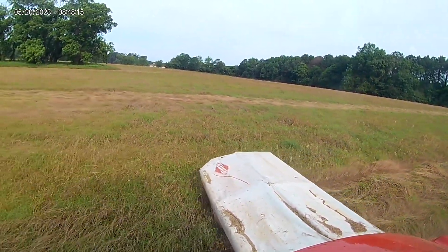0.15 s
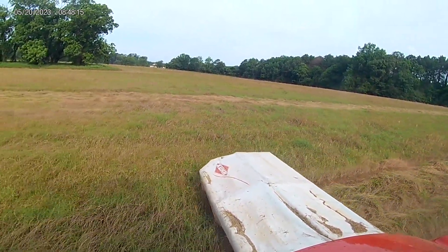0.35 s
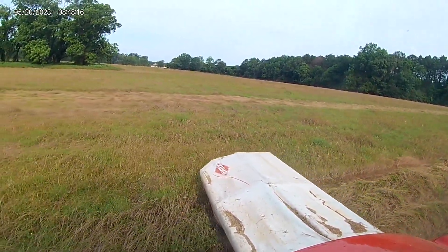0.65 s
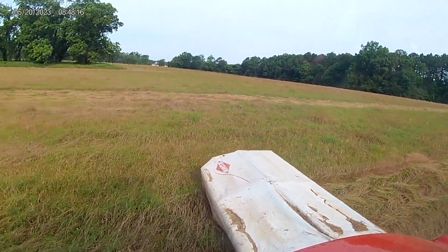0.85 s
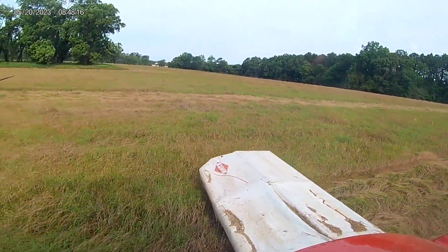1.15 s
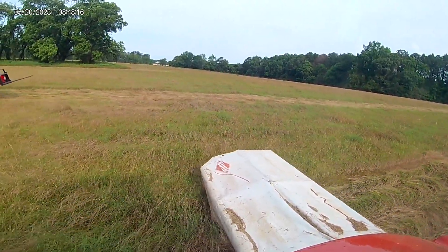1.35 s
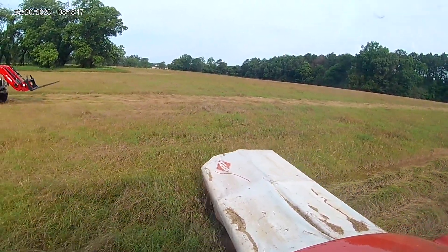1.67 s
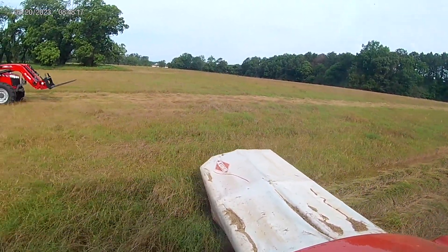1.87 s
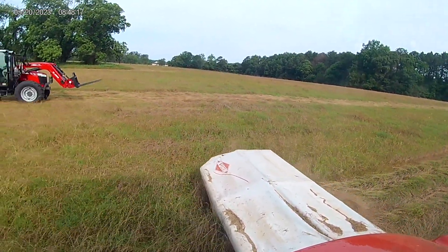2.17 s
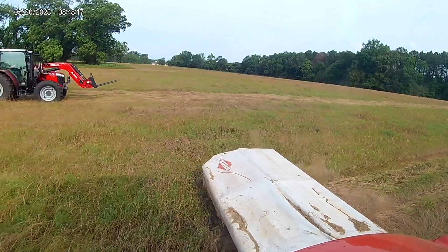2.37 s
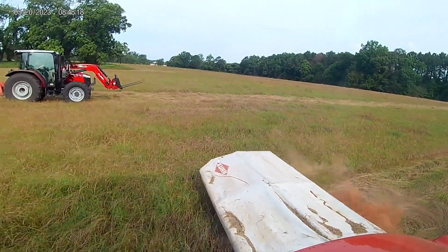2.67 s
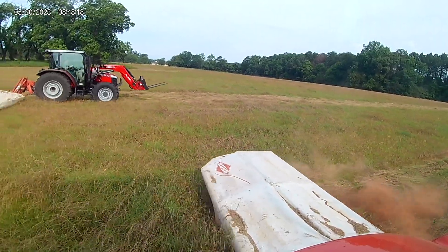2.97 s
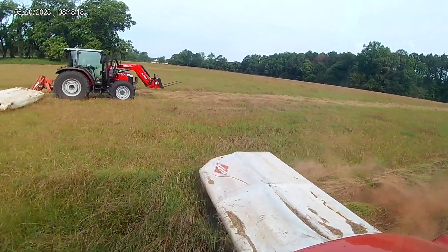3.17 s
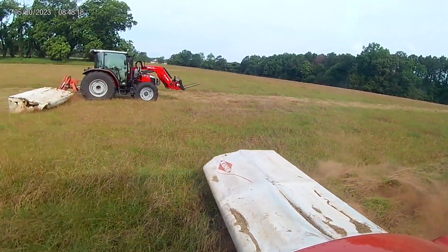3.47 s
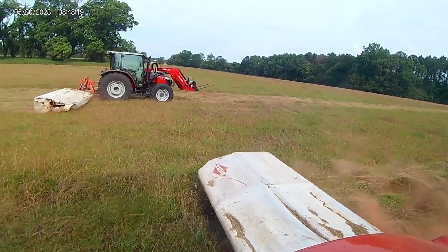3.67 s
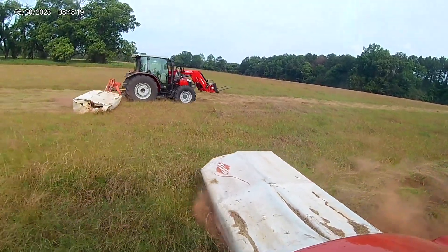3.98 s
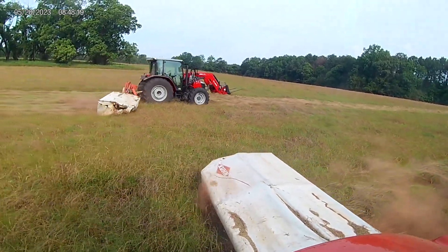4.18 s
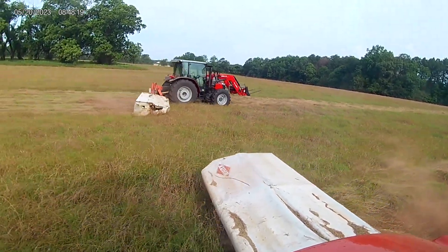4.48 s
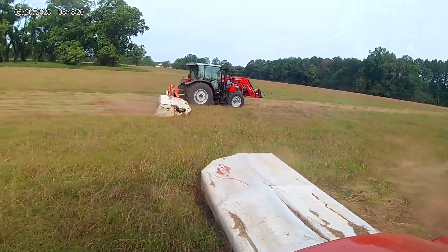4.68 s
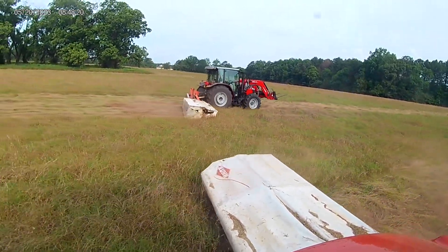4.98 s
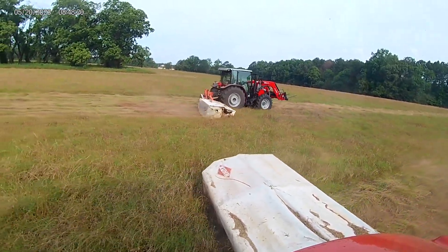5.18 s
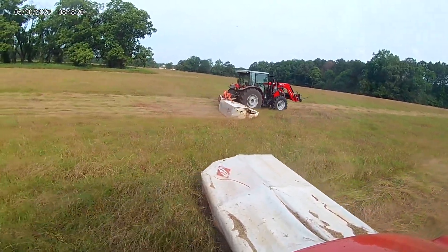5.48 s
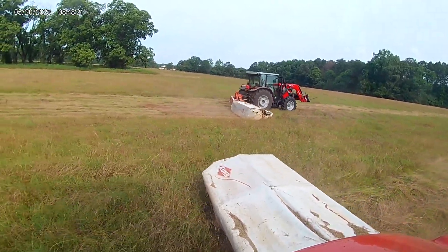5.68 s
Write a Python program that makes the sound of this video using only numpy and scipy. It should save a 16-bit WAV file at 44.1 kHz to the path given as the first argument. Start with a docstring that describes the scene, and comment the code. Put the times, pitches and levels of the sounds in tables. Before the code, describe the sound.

A tractor engine drones under load with a steady mid-pitched gear whine and a muffled, booming roar of rattling panels.

```python
"""From the start a tractor pulls a disc mower through hay; the microphone sits in a closed housing on the tractor.
One driveline speed sets the engine drone, the fan and the gear whine all through; random noise makes panels roar.
The frame booms in random swells, and faint tones peep, mostly in the first second.
Thick hay slows the drive, most of all near 3.4 s; the deep thump is weakest at 1.5 s and strongest at 5.3 s.
The housing muffles the treble throughout, down to the recorder's own hiss."""
import sys
import numpy as np
from scipy import signal
from scipy.fft import rfft, irfft
from scipy.io import wavfile
from scipy.ndimage import uniform_filter1d

SR = 44100
rng = np.random.default_rng(int(sys.argv[2]) if len(sys.argv) > 2 else 0)


def wav_out(sig):
    """Save sig, one row per channel (or a flat mono array), as 16-bit PCM at SR to the path in sys.argv[1]."""
    wavfile.write(sys.argv[1], SR, np.round(np.clip(np.atleast_2d(sig).T, -1, 1) * 32767).astype(np.int16))


N = 257544  # length of the sound [samples]


def undb(db):
    """Turn a level in dB into a plain gain."""
    return 10 ** (np.asarray(db) / 20)


def curves(table):
    """Draw straight lines between the rows of a table: one value per sample for each column after the time."""
    times, *columns = np.transpose(table)
    return [np.interp(np.arange(N) / SR, times, column) for column in columns]


def walk(rate):
    """A smooth random curve of mean 0 and spread 1, with `rate` fresh random values a second."""
    hold = int(SR / rate)
    steps = np.repeat(rng.standard_normal(N // hold + 1), hold)
    # two running averages turn the steps into smooth slopes
    curve = uniform_filter1d(uniform_filter1d(steps, hold), hold)[:N]
    return (curve - curve.mean()) / curve.std()


def tone(turns, db, waver_db, slip):
    """A sine locked to a shaft; its level (dB) and phase (slip, radians) waver as loads shift."""
    level_db = db + waver_db * (walk(9) + 0.68 * walk(40))
    phase = 2 * np.pi * turns + slip * walk(14)
    return np.sqrt(2) * undb(level_db) * np.sin(phase)


def resonance(hz, at, width):
    """Bell curve of a resonance: 1 at its pitch, one half at the edges of its width."""
    return 1 / (1 + (2 * (hz - at) / width) ** 2)


def noise(colour, peaks=(), gate=1):
    """White noise, gated in time, then filtered to a (Hz, dB per Hz) colour with resonances on top."""
    hz = np.fft.rfftfreq(N, 1 / SR) + 1  # 1 Hz up, so that the logarithm exists
    colour_hz, colour_db = np.transpose(colour)
    db = np.interp(np.log(hz), np.log(colour_hz), colour_db)
    for at, width, rise_db in peaks:
        db = db + rise_db * resonance(hz, at, width)
    white = rfft(gate * rng.standard_normal(N))
    return irfft(white * undb(db), N) * np.sqrt(SR / 2)  # the root makes the levels count per Hz


def surges(table):
    """Tones that swell and fade, each straying about its own pitch; also returns how fully a surge is on."""
    edge_s = 0.032  # rise and fall time; start and end are the half-way points
    t, sound, on = np.arange(N) / SR, np.zeros(N), np.zeros(N)
    stray = 0.4 * walk(25)  # shared phase wander [radians]
    for start, length, db, hz in table:
        inside = np.minimum(t - start, start + length - t) / edge_s + 0.5
        shape = np.sin(np.pi / 2 * np.clip(inside, 0, 1)) ** 2
        phase = 2 * np.pi * (hz * t + rng.random()) + stray
        sound += np.sqrt(2) * undb(db) * shape * np.cos(phase)
        on = np.maximum(on, shape)
    return sound, on


def peeps():
    """Brief faint tones above the whine's octave, each a sine that swells and fades."""
    # faint tones: (start [s], length [s], level [dB], pitch [Hz])
    faint_tones = [(.38, 0.057, -41, 1036), (.63, .09, -34.5, 1045), (.74, 0.059, -37.5, 1036),
                   (.88, .08, -55, 2740), (.99, .05, -56, 2755), (2.72, .12, -41, 1100),
                   (3.92, 0.045, -36, 1100), (5.37, 0.06, -37, 1035)]
    sound, _ = surges(faint_tones)
    return sound


def fan(shaft):
    """Blades pass seven times a turn of the belt-driven shaft, which adds a hum at other multiples."""
    # fan tones: (multiple of the shaft rate, level [dB])
    fan_tones = [(3, -40), (5, -32), (7, -29), (8, -40), (9, -43.5), (10, -41.5), (14, -49)]
    return sum(tone(k * shaft, db, waver_db=0.47, slip=0.11) for k, db in fan_tones)


def waver_in_bands(rattle):
    """The treble above 1 kHz wavers at random in narrow bands, most deeply high up."""
    # depth of each band's own wavering: (pitch [Hz], depth [dB])
    waver_depth = [(1000, 1.5), (2100, 2.0), (2700, 4.5), (4600, 5.5)]
    waver_hz, waver_db = np.transpose(waver_depth)
    edges_hz = np.geomspace(1000, 4800, 57)
    shared_db = 0.22 * walk(2.2) + 0.27 * walk(7.9) + 0.44 * walk(120)
    sound = rattle
    for low, high in zip(edges_hz, edges_hz[1:]):
        band = signal.sosfiltfilt(signal.butter(2, (low, high), "band", fs=SR, output="sos"), rattle)
        depth_db = np.interp(low, waver_hz, waver_db)
        gain = undb(shared_db + depth_db * walk(32))
        gain = gain / np.sqrt(np.mean(gain ** 2))  # keeps the average power of the gain at 1
        sound = sound + (gain - 1) * band  # swaps the steady band for the wavering one
    return sound


def roar(crank):
    """Panels rattled by blades and combustion: noise lifted at every firing, two a turn of the crank."""
    # colour of the roar before its overall gain: (pitch [Hz], level [dB per Hz])
    colour = [(20, -52), (60, -54.5), (75, -51.5), (100, -49), (128, -49), (190, -48.5), (250, -51.5),
              (400, -49.5), (600, -55), (1000, -58.5), (1800, -69.5), (2200, -74), (3000, -86), (3900, -91),
              (4600, -101)]
    # panel resonances on the roar: (pitch [Hz], width [Hz], rise [dB])
    panels = [(95, 6.5, 5), (116, 12, 5), (174, 8.7, 3), (235, 21, 4.5), (283.5, 24, 8), (354, 23, -0.5),
              (460, 30, 0), (493, 46, 5), (850, 31, 4), (922, 26, 6), (1105, 56, 3), (1291, 46, 7.5),
              (1505, 20, 4.5), (1630, 69, 3.5), (1790, 70, 6), (3860, 340, 4.5)]
    # gain of the deepest thump: (time [s], level [dB])
    jolts = [(0, 2), (1, 2.5), (1.5, -7.5), (2, 0), (4.5, 0.5), (5.3, 10), (5.84, 2)]
    firing = 1 + 0.059 * np.cos(4 * np.pi * crank)
    muffled = colour + [(6000, -122)]  # the closed housing lets little treble in
    sound = undb(-2.5) * noise(muffled, panels, firing)
    # thump, body and rattle swell each in their own time
    thump = signal.sosfiltfilt(signal.butter(2, 55, fs=SR, output="sos"), sound)
    rattle = signal.sosfiltfilt(signal.butter(2, 1000, "high", fs=SR, output="sos"), sound)
    body = sound - thump - rattle
    thump_db = curves(jolts)[0]
    return undb(thump_db) * thump + undb(0.5 * walk(5.9)) * body + waver_in_bands(rattle)


def boom(at, width, db):
    """A frame mode: random shaking makes it hum and surge; a surge takes the place of the hum."""
    # loudest surges of all the frame modes: (start [s], length [s], level [dB], pitch [Hz])
    loud_surges = [(0.172, 0.1, -27, 151.2), (0.232, 0.047, -18.5, 104.3), (0.358, 0.03, -16, 107.7),
                   (0.42, 0.078, -19.5, 99), (0.54, 0.083, -17, 101), (0.656, 0.17, -23, 151.6),
                   (0.97, 0.076, -20, 98.7), (1, 0.051, -20.5, 151.7), (1.377, 0.094, -17, 104.4),
                   (1.474, 0.12, -29, 149.5), (1.558, 0.085, -18, 101.3), (1.764, 0.053, -22.5, 107),
                   (2.08, 0.065, -18.5, 102.8), (2.345, 0.091, -16.5, 99.8), (2.605, 0.085, -17.5, 104.3),
                   (2.793, 0.065, -17.5, 104.4), (3.066, 0.052, -17, 100.2), (3.31, 0.089, -15.5, 100.4),
                   (3.396, 0.063, -26, 150), (3.448, 0.068, -20.5, 99), (3.617, 0.1, -20.5, 103),
                   (3.74, 0.069, -18, 101.3), (3.791, 0.054, -20.5, 147.4), (3.883, 0.092, -17, 101.4),
                   (4.239, 0.054, -18.5, 101), (4.565, 0.037, -17.5, 98), (4.684, .05, -22, 163),
                   (4.819, 0.024, -15, 112), (4.897, 0.058, -17, 105.5), (4.976, 0.11, -19, 106.8),
                   (5.213, 0.092, -20, 98.6), (5.3, 0.1, -18, 100.2), (5.435, 0.03, -15.5, 150),
                   (5.496, 0.049, -16, 156), (5.59, 0.22, -24.5, 150.2), (5.658, 0.055, -18.5, 104.7),
                   (5.74, 0.056, -17, 105)]
    hz = np.fft.rfftfreq(N, 1 / SR)
    hum = irfft(rfft(rng.standard_normal(N)) * resonance(hz, at, width), N)
    # this mode takes the surges less than two widths away
    near = [row for row in loud_surges if abs(row[-1] - at) < 2 * width]
    surging, on = surges(near)
    return undb(db) * hum / hum.std() * (1 - on) + surging


def engine(crank):
    """Tones at whole and half multiples of the crank, in step as in a pulse; timing gears hum brokenly."""
    # steady drone: (multiple of the crank rate, level [dB])
    orders = [(1, -43), (2, -36.5), (6.5, -38), (7, -38), (8.5, -37), (10, -43), (11, -40.5), (12, -40),
              (13, -43), (16.5, -41), (18, -41), (30, -48.5), (42, -51.5)]
    # swell of the strongest multiples: (time [s], fourth [dB], fifth [dB], sixth [dB])
    throb_levels = [(0.0, -23, -39, -24.5), (0.18, -28.5, -26, -27), (1.59, -24.5, -28, -29.5),
                    (2.05, -29, -21.5, -27), (2.13, -29, -44, -27), (2.28, -23.5, -23.5, -26.5),
                    (2.55, -23, -33.5, -27), (2.6, -22, -41, -26), (2.7, -26, -25, -26),
                    (3.09, -30, -26.5, -25), (3.3, -24, -26, -29), (3.38, -32, -36, -31.5),
                    (3.45, -20, -33, -26.5), (3.84, -35, -22, -30.5), (3.92, -27, -32.5, -22),
                    (4.28, -27.5, -22, -29.5), (4.8, -25.5, -34.5, -27), (4.94, -34, -24, -30),
                    (5.06, -25, -23.5, -31.5), (5.73, -29.5, -29, -28), (5.79, -21, -18.5, -34),
                    (5.84, -39, -31, -30.5)]
    # teeth of each timing gear: one count per gear
    teeth_counts = (23, 31, 44, 46, 48)
    # swell of the timing gears: (time [s], then one level [dB] for each gear)
    timing_levels = [(0.0, -34, -36, -51, -47, -37), (0.06, -39, -40, -47.5, -52, -54),
                     (0.13, -39, -43, -44.5, -49, -40), (0.78, -39, -39.5, -49, -52.5, -43),
                     (0.99, -33, -50, -51.5, -49, -44), (1.06, -32, -40, -43, -51, -42),
                     (1.12, -31, -43, -49, -51, -43.5), (1.22, -39, -54, -45, -50, -47.5),
                     (1.59, -41, -35, -47, -50, -41), (1.97, -33.5, -47, -46, -41, -48.5),
                     (2.37, -42.5, -38, -49.5, -49.5, -43.5), (2.54, -38.5, -52, -42, -43, -42.5),
                     (3.25, -39, -41.5, -49, -47, -43.5), (3.32, -29, -37, -46, -44, -40),
                     (3.35, -33, -41.5, -46.5, -47, -48.5), (3.69, -44, -43, -44.5, -48, -42.5),
                     (4.5, -37.5, -44, -49.5, -54, -48.5), (4.9, -41, -40.5, -52, -49.5, -51),
                     (4.91, -50, -49, -54.5, -50, -51), (5.06, -36, -45, -50, -48, -48),
                     (5.3, -44.5, -44, -52.5, -50, -47), (5.84, -39.5, -48.5, -52.5, -50, -50)]
    # high multiples slip more
    drone = sum(tone(k * crank, db, waver_db=0.6, slip=0.25 + 0.02 * k) for k, db in orders)
    throb = sum(tone(k * crank, db, waver_db=1.06, slip=0.61)
                for k, db in enumerate(curves(throb_levels), start=4))
    timing = sum(tone(teeth * crank, db, waver_db=1.53, slip=1.4)
                 for teeth, db in zip(teeth_counts, curves(timing_levels)))
    return drone + throb + timing


def gears(mesh):
    """Meshing teeth whine with an octave; shafts that run out of true put side tones by the whine."""
    # swell of the gear tones: (time [s], whine [dB], octave [dB])
    whine_levels = [(0.05, -22.5, -23.5), (0.4, -20, -26.5), (0.53, -22.5, -24.5), (0.66, -19.5, -24.5),
                    (0.75, -23, -25.5), (1.01, -19, -25.5), (1.17, -22, -25), (1.52, -23.5, -23.5),
                    (1.57, -19, -29), (1.6, -19, -24.5), (1.76, -21, -25), (1.8, -23.5, -24.5),
                    (2.03, -20, -25.5), (2.16, -24, -25), (2.52, -18.5, -25.5), (2.6, -22.5, -23),
                    (3.7, -21, -26.5), (3.73, -18.5, -23), (3.97, -23, -25.5), (4.28, -20.5, -25.5),
                    (4.36, -23.5, -27.5), (4.63, -22.5, -25.5), (5.37, -21, -27), (5.59, -23, -26),
                    (5.64, -21.5, -25.5), (5.8, -22, -25)]
    # other gear tones: (multiple of the meshing rate, level [dB])
    gear_tones = [(.0391, -42), (.9607, -53), (.9167, -45), (1.0393, -45), (1.0833, -34), (1.8648, -44),
                  (1.9004, -42), (1.9167, -46), (2.0393, -39), (2.0833, -43), (3, -47), (3.0393, -56),
                  (4, -54.5)]
    whine_db, octave_db = curves(whine_levels)
    whine = tone(mesh, whine_db, waver_db=0.88, slip=0.41)
    octave = tone(2 * mesh, octave_db, waver_db=0.42, slip=0.39)
    # each of the other tones starts at its own random angle
    others = sum(tone(k * mesh + rng.random(), db, waver_db=2.5, slip=0.7) for k, db in gear_tones)
    return whine + octave + others


def scene():
    """All the shafts share one driveline speed, counted in teeth meshed from a random start."""
    # drive gear, slowing in thick hay: (time [s], tooth meshing rate [Hz])
    drive = [(0, 455.3), (.43, 456.1), (.75, 456), (1.2, 454.3), (1.55, 456.1), (2.05, 453), (2.27, 454.7),
             (2.53, 452.5), (2.7, 454.3), (3.1, 456.2), (3.23, 455.1), (3.4, 451.2), (3.51, 451.3),
             (3.7, 454.7), (4.05, 455.9), (4.5, 456.5), (5.84, 456.7)]
    # frame modes kept humming by random shaking: (pitch [Hz], width [Hz], level [dB])
    frame = [(101.2, 8.8, -25.5), (150, 21, -31)]
    mesh = np.cumsum(curves(drive)[0]) / SR + 1000 * rng.random()
    crank = mesh / 13.715  # teeth meshed per crank turn
    fan_shaft = mesh / 10.053  # teeth meshed per fan turn
    booms = sum(boom(at, width, db) for at, width, db in frame)
    sound = peeps() + fan(fan_shaft) + roar(crank) + booms + engine(crank) + gears(mesh)
    return sound[None]


def record(dry):
    """Peaks round off softly, a faint hiss fills the treble, and the top is cut."""
    # colour of the hiss: (pitch [Hz], level [dB per Hz])
    hiss_colour = [(3000, -108), (7200, -106), (7800, -110), (8200, -104), (16000, -106)]
    level_db = -9 * np.clip(walk(32) - 0.8, 0, 2)
    hiss = undb(level_db) * noise([(1500, -130)] + hiss_colour)
    sound = np.tanh(0.43 * dry) / 0.37 + hiss
    fade_in = np.clip(np.arange(N) / SR / 0.004, 0, 1)  # 4 ms
    top_cut = signal.ellip(10, 0.2, 80, 15750, fs=SR, output="sos")  # steep cut above 15750 Hz
    return signal.sosfilt(top_cut, fade_in * sound)


dry = scene()
out = record(dry)
wav_out(out)
```